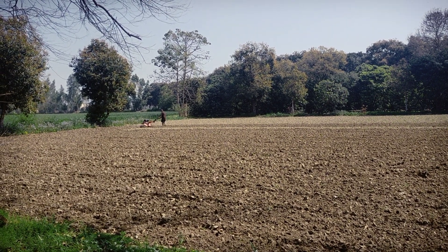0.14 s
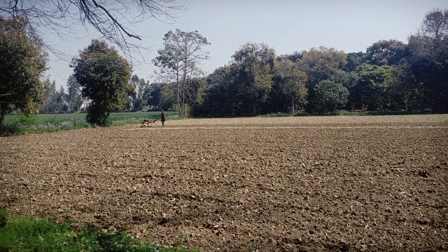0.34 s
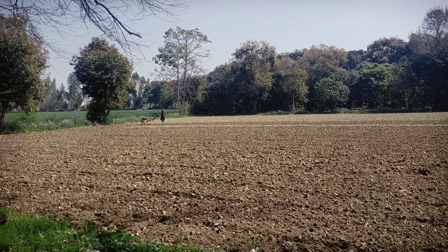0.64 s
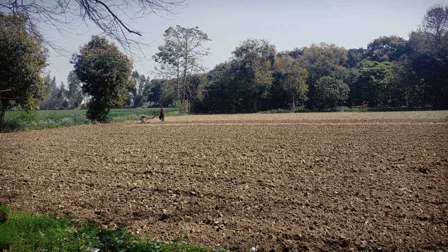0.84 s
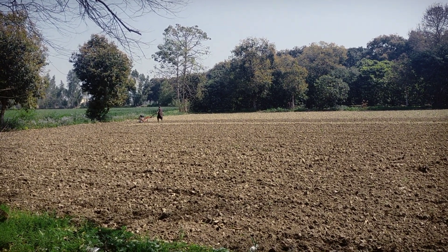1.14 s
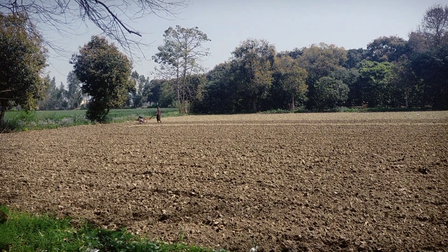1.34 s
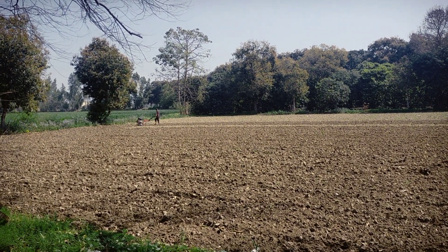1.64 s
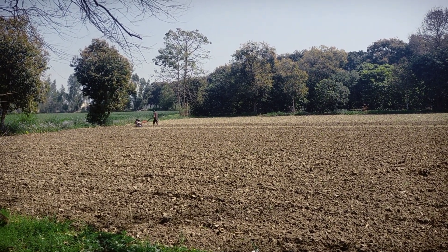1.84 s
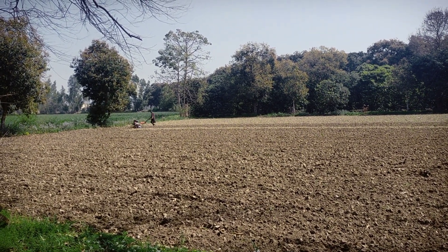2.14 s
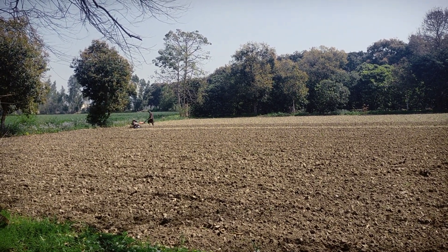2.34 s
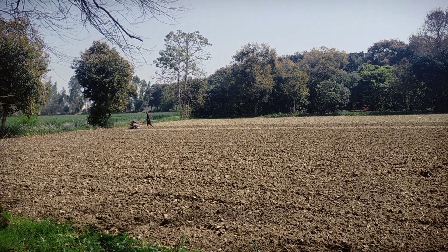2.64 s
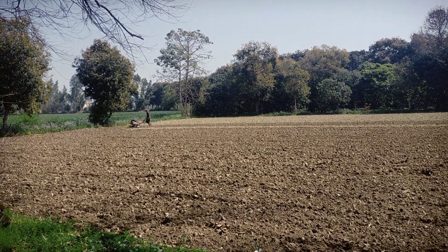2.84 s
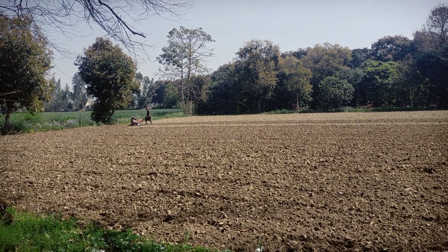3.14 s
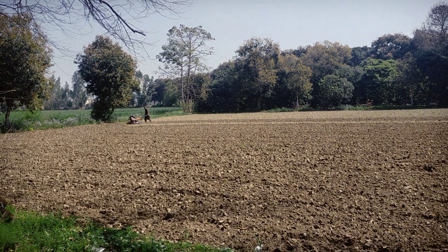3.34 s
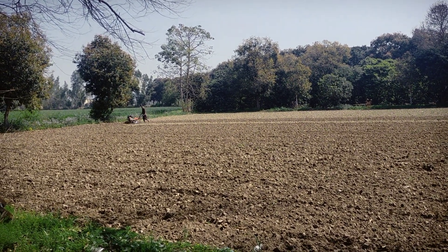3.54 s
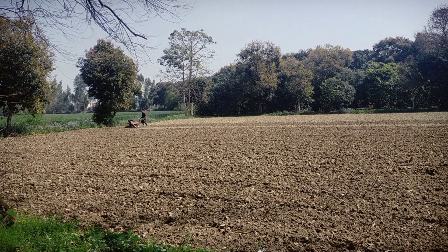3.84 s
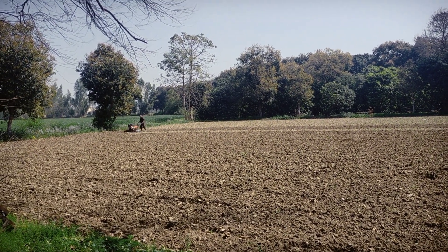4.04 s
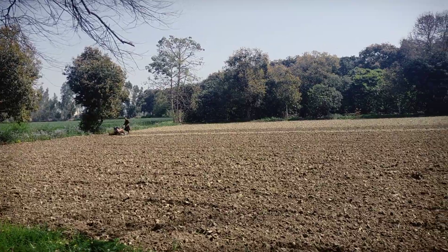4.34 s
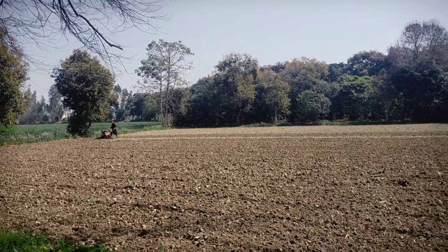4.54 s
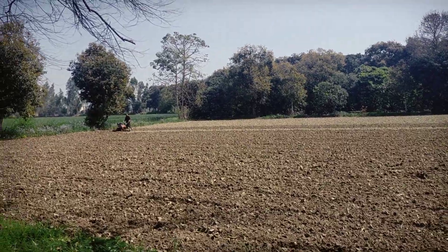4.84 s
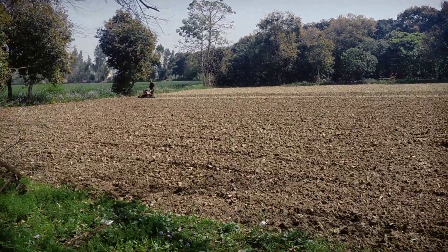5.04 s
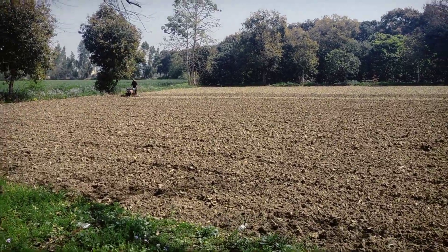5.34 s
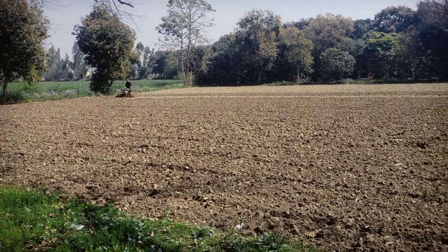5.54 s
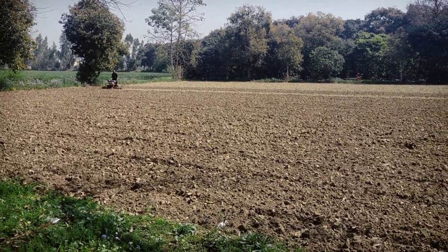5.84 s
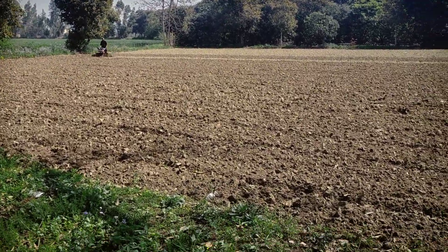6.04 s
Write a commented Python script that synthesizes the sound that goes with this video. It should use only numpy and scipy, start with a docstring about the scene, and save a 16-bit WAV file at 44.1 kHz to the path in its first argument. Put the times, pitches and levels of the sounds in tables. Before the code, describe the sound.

Steady rapid putter of a small tilling engine far across a field, joined near the end by sharp close crackles and handling taps.

```python
"""Far side of a field: a single-cylinder walk-behind tractor tills while its governor hunts about twice a second.
Exhaust is a sum of orders of the firing rate; clatter is noise shaken by three knocks a cycle, ringing panels.
Late on, the person holding the microphone shifts on dry litter: filtered noise cracks rustle and snap,
short rings with dull scuffs knock on the case. Low filtered noise is light wind on the microphone."""
import sys
import numpy as np
from scipy import signal
from scipy.fft import rfft, irfft
from scipy.io import wavfile
from scipy.ndimage import uniform_filter1d

SR = 44100
rng = np.random.default_rng(int(sys.argv[2]) if len(sys.argv) > 2 else 0)


def wav_record(signal):
    """Record a signal, one row per channel, as 16-bit PCM in the file named by sys.argv[1]."""
    frames = np.transpose(np.atleast_2d(signal))
    bounded = np.clip(frames, -1, 1)
    # unit amplitude maps onto the largest positive 16-bit level
    quanta = np.round(bounded * 32767).astype(np.int16)
    wavfile.write(sys.argv[1], SR, quanta)


N = 273420


def undb(db):
    """Amplitude ratio of a level in dB."""
    return 10 ** (np.asarray(db) / 20)


def level(x, db):
    """Scale x to an RMS level in dB."""
    return x * undb(db) / np.sqrt(np.mean(x ** 2))


def columns(table):
    """Each column of a curve, interpolated at every sample."""
    time_s, *rest = np.transpose(table)
    return [np.interp(np.arange(N) / SR, time_s, column) for column in rest]


def bandpass(x, order, low_hz, high_hz):
    """Butterworth band of x."""
    return signal.sosfilt(signal.butter(order, [low_hz, high_hz], "band", fs=SR, output="sos"), x)


def colour(x, points):
    """Minimum-phase filter through (Hz, dB) points; power gain 1 for white noise."""
    size = 2048
    hz = np.maximum(np.arange(size // 2 + 1) * SR / size, 1)
    point_hz, point_db = np.transpose(points)
    log_gain = np.interp(np.log(hz), np.log(point_hz), point_db) * np.log(10) / 20
    cepstrum = irfft(log_gain)
    causal = np.r_[cepstrum[0], 2 * cepstrum[1:size // 2], np.zeros(size // 2)]
    response = irfft(np.exp(rfft(causal)))
    return signal.fftconvolve(x, response / np.sqrt(np.sum(response ** 2)))[:len(x)]


def walk(rate_hz):
    """Random levels held 1 / rate_hz and slewed twice; spread near 1."""
    hold = int(SR / rate_hz)
    steps = np.repeat(rng.standard_normal(N // hold + 1), hold)
    return 1.3 * uniform_filter1d(uniform_filter1d(steps, hold), hold)[:N]


# tines biting hard soil: start_s, sag_scale_hz
CLOD_BITES = [(0.104, 0.38), (0.648, 0.25), (0.829, 0.77), (1.236, 0.78), (1.715, 0.49), (2.198, 0.67),
              (2.76, 0.4), (3.208, 0.86), (3.719, 0.32), (4.177, 0.21), (4.721, 0.64), (5.294, 0.8),
              (5.751, 1.0)]
GOVERNED_HZ, HUNT_HZ, SETTLE_S, THROTTLE_LAG_S = 24.53, 2.1, .16, .075


def sag():
    """Each clod pulls the firing rate down; the governor overshoots and settles (Hz below the set rate)."""
    out = np.zeros(N)
    since_s = np.arange(int(8 * SETTLE_S * SR)) / SR
    envelope = since_s / SETTLE_S * np.exp(1 - since_s / SETTLE_S)
    swing = envelope * np.sin(2 * np.pi * HUNT_HZ * since_s)
    for start_s, sag_hz in CLOD_BITES:
        part = out[int(start_s * SR):][:len(swing)]
        part += sag_hz * swing[:len(part)]  # writes into out
    return out


# exhaust orders: firing_rate_multiple, relative_level_db, unsteadiness_db
EXHAUST_ORDERS = [(1, -20, 7.5), (2, -2.5, 0.5), (3, -13.5, 1), (4, -11.5, 1), (5, 0.5, 1.6), (6, -12.5, 3),
                  (7, -26.5, 2.5), (8, -32.5, 7), (14, -30.5, 0.8)]
# exhaust as the machine draws nearer, before throttle: time_s, level_db, second_order_boost_db
EXHAUST_APPROACH = [(0, -48.5, 3), (1.5, -46.5, 0), (3.0, -45.5, -3), (3.7, -45.5, -1), (4.9, -43.5, -1.5),
                    (5.2, -45, -2.5), (6.2, -44, -0.5)]
LOAD_DB_PER_HZ = 4  # orders above the fifth, per Hz of sag
THROTTLE_DB_PER_HZ = 1.3  # whole exhaust, per Hz of delayed sag


def exhaust(drop_hz, turns, throttle_hz):
    """One pressure pulse a cycle, as orders in step; gusty air over the field unsettles each."""
    level_db, second_db = columns(EXHAUST_APPROACH)
    out = 0
    for order, db, loose_db in EXHAUST_ORDERS:
        order_db = db + loose_db * walk(9)
        if order == 2:
            order_db = order_db + second_db
        if order > 5:
            order_db = order_db + LOAD_DB_PER_HZ * drop_hz
        phase_rad = 2 * np.pi * order * turns + .18 * loose_db * walk(6)
        out = out + undb(order_db) * np.cos(phase_rad)
    return undb(level_db + THROTTLE_DB_PER_HZ * throttle_hz) * np.sqrt(2) * out


# knocks in one cycle: place_cycles, decay_cycles, mean_level_db
CYCLE_KNOCKS = [(.15, .08, -2), (.58, .14, 2), (.85, .12, 1)]
# clatter spectrum: frequency_hz, relative_density_db_per_hz
CLATTER_SPECTRUM = [(110, -44), (180, -4), (221, -19), (334, -23), (495, -15), (953, -1.5), (1900, -1.5),
                    (2130, -0.5), (3040, -7), (3340, -8), (4860, -16.5), (7200, -16.5), (9710, -29.5),
                    (14100, -20), (15800, -23)]
# ringing panels, gains over the broad clatter: centre_hz, width_hz, side_on_db, turned_db
RINGING_PANELS = [(592, 125, -1.5, 1.5), (702, 47, -10.5, 5.5), (965.4, 42, -1.5, -0.5),
                  (1080, 220, -14, -7), (1254, 63, 2, -9), (1556, 227, -4.5, -10.5), (1712, 68, -8, -2),
                  (2067, 164, -3, -12), (2191, 105, 1.5, -5), (2326, 140, -2, -9.5), (2723, 60, -4, -12),
                  (2870, 62, -3, -16), (3344, 170, 5, -7), (3515, 290, -3, -9), (3860, 270, -4.5, -5),
                  (4193, 260, 0, 1), (4605, 105, 0, -1), (5200, 170, 1, -12), (5740, 600, -3, -15),
                  (6150, 160, -6, -7), (7160, 280, -2, -8), (7740, 280, -7, 2)]
# chain and tines, ringing faintly at the top: centre_hz, width_hz, side_on_db, turned_db
RINGING_SMALL_PARTS = [(9060, 350, -5, -7), (10400, 300, -2, -12), (11350, 450, -7, -8),
                       (12300, 350, -7, -7), (13600, 260, 1, -12), (14100, 330, -2, -3),
                       (14650, 300, -4, -7)]
# clatter over time: time_s, level_db, treble_offset_db (before throttle), turn_to_listener_0_to_1
CLATTER_COURSE = [(0, -45, 1.5, 0), (1.3, -46, 2, 0.3), (1.8, -44.5, -1.5, 0.3), (2.8, -44, -1, .35),
                  (3.45, -43.5, 0, 0.3), (4.2, -44, -1, .7), (4.7, -43, -6.5, 1), (6.2, -41.5, -7.5, 0.45)]
THROTTLE_TREBLE_DB_PER_HZ = 1.44


def clatter(turns, throttle_hz, smooth=4.5, scatter_db=3.5, treble_smooth=1.1):
    """Noise shaken by three knocks a cycle rings the panels; the treble follows the knocks most."""
    level_db, treble_db, turned = columns(CLATTER_COURSE)
    cycle = turns.astype(int)
    knocking = 0
    for place, decay, db in CYCLE_KNOCKS:
        force = undb(db + scatter_db * rng.standard_normal(N // 1000))[cycle]  # every knock differs
        knocking = knocking + force * np.exp(-((turns - place) % 1) / decay)
    low = level(rng.standard_normal(N) * (smooth + .5 * knocking), 0)
    high = level(rng.standard_normal(N) * (treble_smooth + knocking), 0)
    high = high * undb(treble_db + THROTTLE_TREBLE_DB_PER_HZ * throttle_hz + 0.2 * walk(5.35))
    split = signal.butter(2, 4200, fs=SR, output="sos")
    shaken = signal.sosfilt(split, low - high) + high  # low below the split, high above
    rung = shaken
    for hz, width_hz, side_db, front_db in [*RINGING_PANELS, *RINGING_SMALL_PARTS]:
        ring = bandpass(shaken, 2, hz - width_hz / 2, hz + width_hz / 2)
        jolt_db = 1.6 * walk(2.5) + 1.5 * walk(14)  # jolts over the clods
        rung = rung + undb(side_db + turned * (front_db - side_db) + jolt_db) * ring
    return undb(level_db) * level(colour(rung, CLATTER_SPECTRUM), 0)


# litter ranges, each: frequency_hz, relative_density_db_per_hz
LITTER_TOP_SPECTRUM = [(6000, -29), (9000, -11.5), (10500, -5.5), (12200, -4), (14000, 2.5), (15800, -3),
                       (18000, -16)]
LITTER_MIDDLE_SPECTRUM = [(2500, -19.5), (4000, -0.5), (5500, 2.5), (7800, 4), (9300, -4.5), (11000, -18.5)]
LITTER_BODY_SPECTRUM = [(200, -22.5), (400, -14), (700, -16.5), (1100, -5), (2000, 2.5), (2800, 0.5),
                        (4500, -30), (7000, -32)]


def litter(top, middle, body):
    """The same cracks heard through three ranges."""
    bright = colour(top, LITTER_TOP_SPECTRUM) + colour(middle, LITTER_MIDDLE_SPECTRUM)
    return bright + colour(body, LITTER_BODY_SPECTRUM)


# movements on dry litter: start_s, swell_s, hold_s, top_level_db, middle_above_top_db, body_above_top_db
LITTER_MOVEMENTS = [(4.098, .55, 1.55, -55, -3, -11), (4.7, .39, .02, -49, -7, 2.5),
                    (5.129, .02, 0.029, -39.5, -15, -12), (5.423, 0.089, 0.073, -50, -2, 5.5),
                    (5.537, 0.017, 0.032, -36, -3, -2.5), (5.595, 0.011, 0.069, -44, -0.5, 1),
                    (5.788, 0.13, 0.11, -40.5, -3, -2), (6.04, 0.044, .08, -45.5, -3, 0.5),
                    (6.162, .014, .004, -39, -3, -8)]
RUSTLE_FADE_DB_PER_S = 450


def stirring():
    """Gains of the litter's top, middle and body: each movement swells, holds and fades."""
    t_s, power = np.arange(N) / SR, 0
    for start_s, swell_s, hold_s, top_db, middle_db, body_db in LITTER_MOVEMENTS:
        swell = np.clip((t_s - start_s) / swell_s, 0, 1)
        fade = undb(-RUSTLE_FADE_DB_PER_S * np.maximum(t_s - start_s - swell_s - hold_s, 0))
        range_db = top_db + np.array([[0], [middle_db], [body_db]])
        power = power + (swell * fade * undb(range_db)) ** 2
    return np.sqrt(power)


def rustle(stir):
    """Dense tiny cracks of uneven size over a soft hiss."""
    cracks = (rng.random(N) < 900 / SR) * undb(3.0 * rng.exponential(size=N))  # 900 per s
    smear = np.exp(-np.arange(200) / (0.00079 * SR))
    crackle = signal.fftconvolve(cracks, smear)[:N]
    grain = level(rng.standard_normal(N) * (1.6 + crackle), 0)
    return litter(*(grain * stir))


# loudest snaps, burst level before decay: start_s, top_level_db, middle_above_top_db, body_above_top_db
LOUD_SNAPS = [(4.84, -35, -16, 2), (5.036, -23, -17, -14), (5.072, -30.5, -25, -7),
              (5.127, -14.5, -8, -3.5), (5.1774, -31, -21, -14), (5.4335, -37, -6, -14),
              (5.4774, -31, -9, -5), (5.5542, -23, -6, -14), (5.556, -15.5, -5, -11), (5.5598, -24, 5, -4),
              (5.574, -21, 2, -9), (5.5773, -12.5, -2.5, -20), (5.5808, -21.5, 3, -13),
              (5.6138, -28, -3, 0), (5.6326, -31, -4, -5), (5.6894, -33, 1, -3), (5.8237, -31, 0, -9),
              (5.8344, -29, -9, -8), (5.9008, -22, -5, -1), (5.921, -20.5, -6, -7), (5.9235, -17, -5, -12),
              (5.944, -22, -8, -10), (6.007, -25, -4, -3), (6.0874, -31, -9, -9), (6.143, -27, -14, -4),
              (6.161, -26, -2, -2), (6.1722, -25, -4, -13), (6.1754, -13, -3, -13)]
SNAP_S, SNAP_ATTACK_S = 0.0025, .00025  # SNAP_S: time to fall 26 dB
SMALL_SNAPS_PER_S, SMALL_SNAP_DB = 14, 9.5  # mean dB above the rustle of the moment


def snaps(stir):
    """Twigs and leaves break: a short noise burst each; small ones come by chance with the rustle."""
    out, t_s = np.zeros((3, N + 600)), np.arange(600) / SR
    shape = np.exp(-3 * t_s / SNAP_S) * np.minimum(t_s / SNAP_ATTACK_S, 1)
    hits = []
    for start_s, top_db, middle_db, body_db in LOUD_SNAPS:
        hits.append((int(start_s * SR), undb(top_db + np.array([0, middle_db, body_db]))))
    for i in np.flatnonzero(rng.random(N) < SMALL_SNAPS_PER_S / SR):
        hits.append((i, stir[:, i] * undb(SMALL_SNAP_DB + 4 * rng.standard_normal(3))))
    for i, gains in hits:
        noise = rng.standard_normal(600)
        burst = noise * shape
        burst = burst * np.linalg.norm(shape) / np.linalg.norm(burst)  # equal energy per burst
        out[:, i:i + 600] += gains[:, None] * burst
    return litter(*out[:, :N])


# knocks on the case: start_s, ring_envelope_peak_db, centre_hz, scuff_start_re_peak_db
CASE_KNOCKS = [(3.85, -51, 400, -1), (4.139, -22.5, 1080, -28), (4.28, -50.5, 380, 2),
               (4.423, -48, 360, -1), (4.73, -48, 400, -3), (5.443, -41, 595, -13), (5.548, -29, 2200, -20),
               (5.553, -42.5, 400, -1), (6.075, -41.5, 390, -3)]


def knocks(rise_cycles=0.49):
    """A finger or strap taps the microphone case: a ring of about two cycles and a longer dull scuff."""
    out, t_s = np.zeros(N + 3000), np.arange(3000) / SR
    for start_s, db, hz, scuff_db in CASE_KNOCKS:
        age = t_s * hz / rise_cycles
        ring = np.sin(2 * np.pi * hz * t_s) * np.exp(1 - age) * age
        noise = bandpass(rng.standard_normal(3000), 1, 0.42 * hz, 3.4 * hz)
        scuff = level(noise, scuff_db) * np.exp(-t_s / 0.029)
        i = int(start_s * SR)
        out[i:i + 3000] += undb(db) * (ring + scuff)
    return out[:N]


# wind spectrum: frequency_hz, relative_density_db_per_hz
WIND_SPECTRUM = [(15, -14), (32, -2), (55, 7), (90, -5.5), (150, -11), (220, -27), (400, -26), (800, -43.5)]
WIND_DB = -48.5


def wind():
    """Light wind on the microphone: steady low filtered noise."""
    return level(colour(rng.standard_normal(N), WIND_SPECTRUM), WIND_DB)


def scene():
    """Engine, litter, case knocks and wind, summed to one channel."""
    drop_hz, lag = sag(), int(THROTTLE_LAG_S * SR)
    throttle_hz = np.r_[np.zeros(lag), drop_hz[:-lag]]  # throttle opens a moment after the speed drops
    turns = np.cumsum(GOVERNED_HZ - drop_hz) / SR
    engine = exhaust(drop_hz, turns, throttle_hz) + clatter(turns, throttle_hz)
    stir = stirring()
    close = rustle(stir) + snaps(stir) + knocks()
    return (engine + close + wind())[None, :]


TOP_HZ = 15760


def record(dry):
    """The handheld microphone cuts the top: steep elliptic low-pass."""
    return signal.sosfilt(signal.ellip(14, .2, 70, TOP_HZ, fs=SR, output="sos"), dry)


dry = scene()
out = record(dry)
wav_record(out)
```